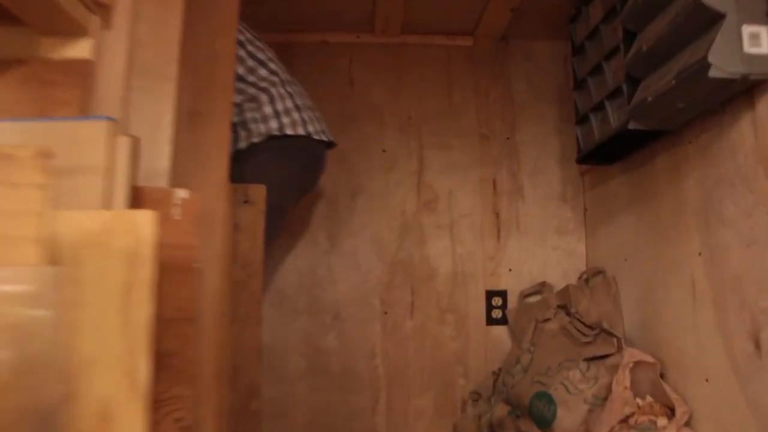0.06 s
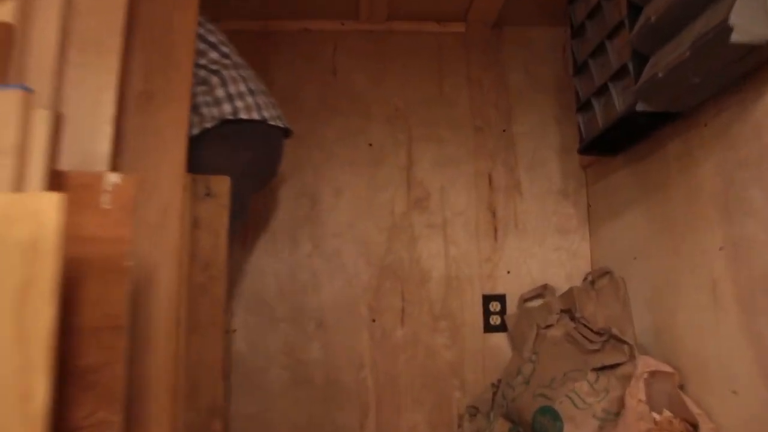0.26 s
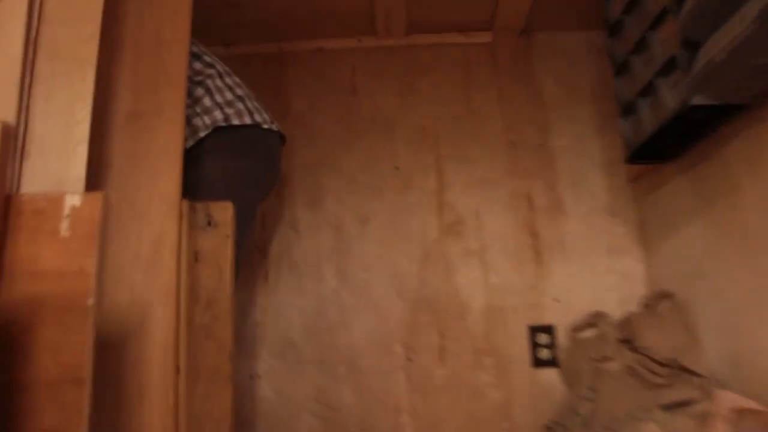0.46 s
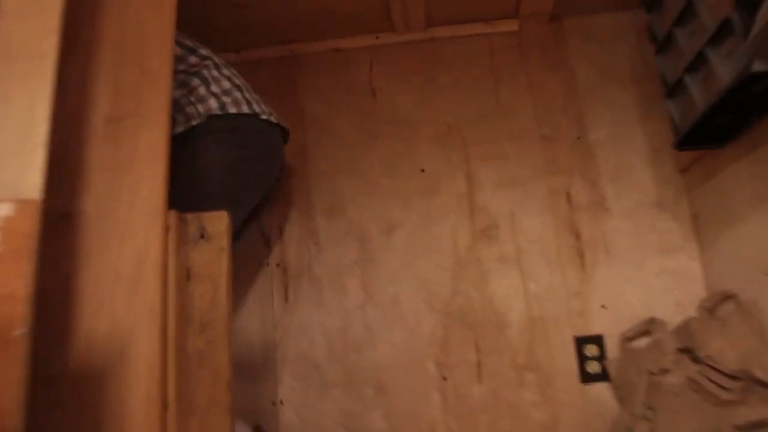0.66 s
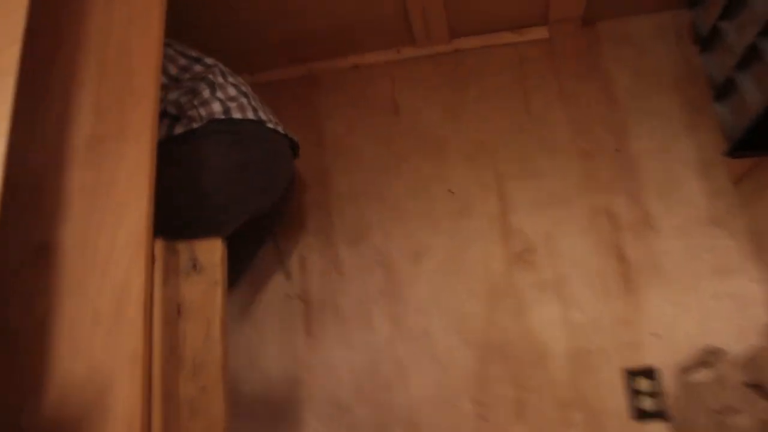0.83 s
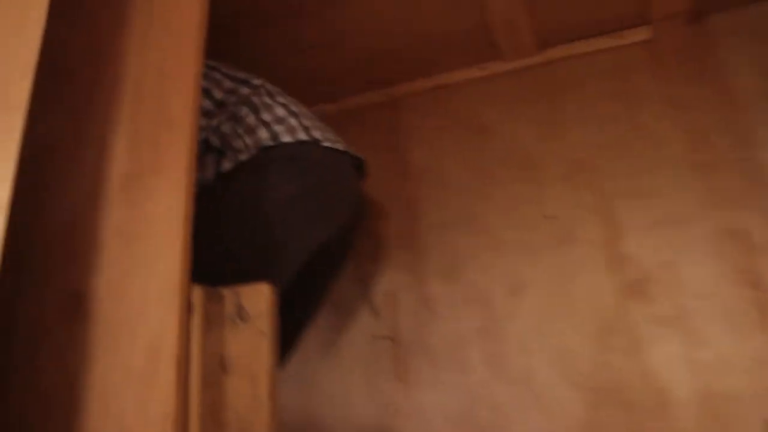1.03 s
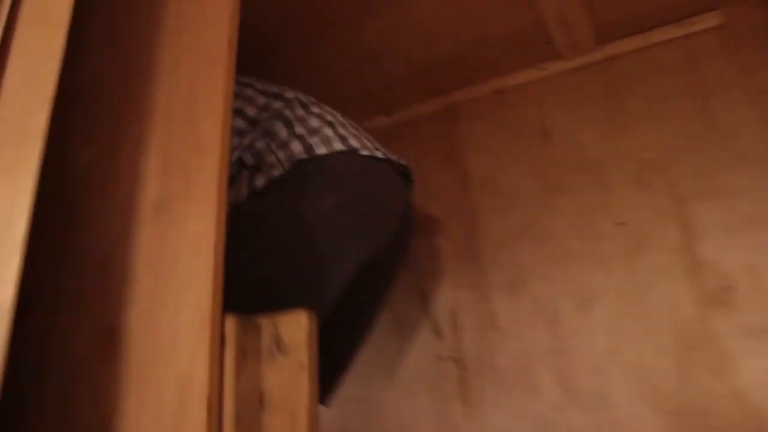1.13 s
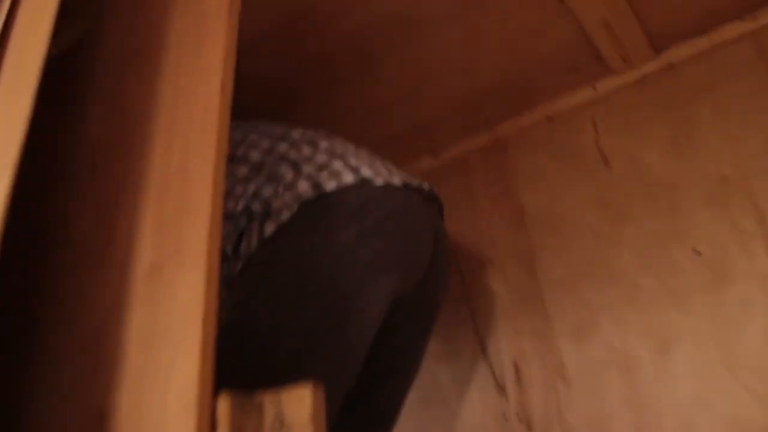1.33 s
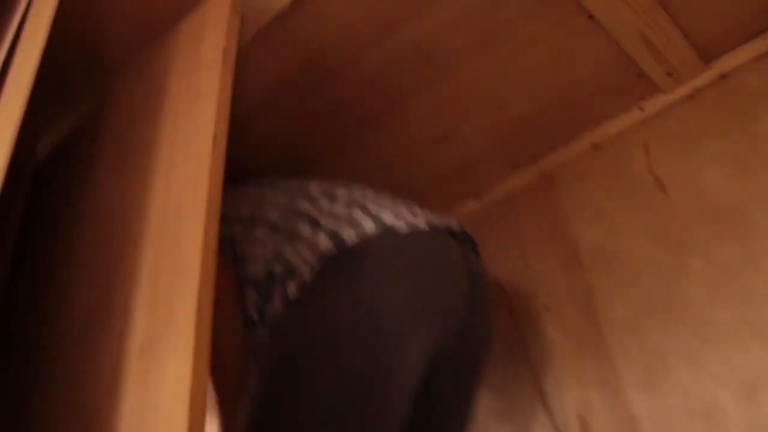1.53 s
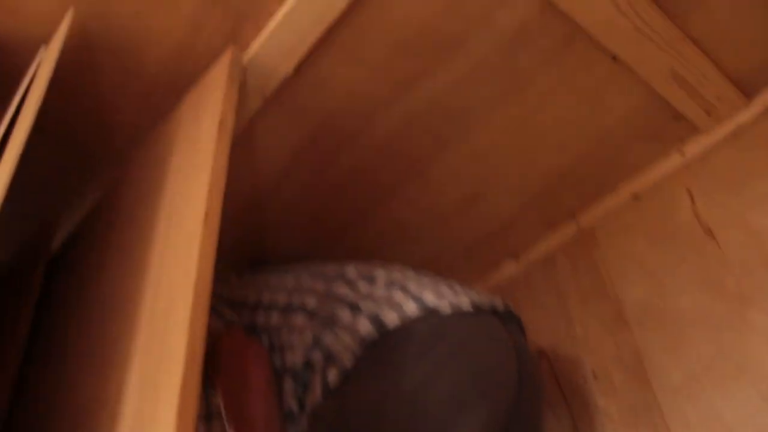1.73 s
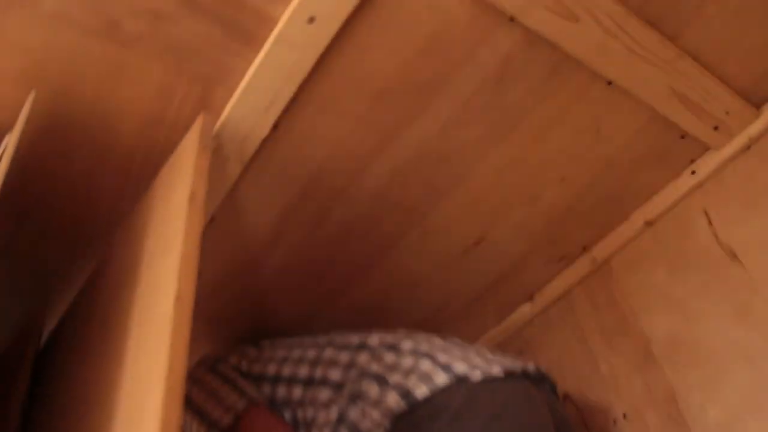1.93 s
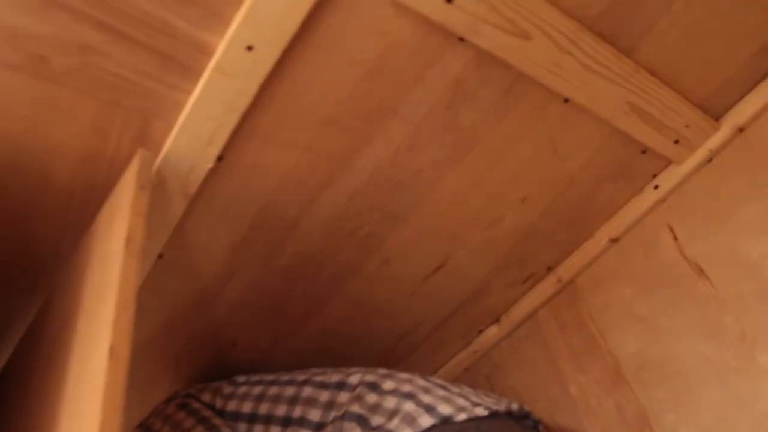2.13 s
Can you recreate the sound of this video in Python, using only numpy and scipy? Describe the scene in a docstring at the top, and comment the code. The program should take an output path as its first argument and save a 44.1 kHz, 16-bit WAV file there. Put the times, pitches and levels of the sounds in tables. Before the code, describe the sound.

Footsteps knock on steep wooden stairs, two hard steps and a softer one, over low hum

```python
"""Footfalls on a wooden staircase

Someone climbs steep wooden stairs in a small timber workshop. Heels and toes knock the treads: decaying
sines for the modes and decaying band noise for crack and tail. A slow boom of the whole staircase follows
each landing as beating low sines. Soles scuff and cloth rustles, both as shaped noise, among two small
ticks. Beneath lie a motor's wavering tones and the steady hiss of the room."""
import sys
import numpy as np
from scipy import signal
from scipy.io import wavfile

SR = 44100
rng = np.random.default_rng(int(sys.argv[2]) if len(sys.argv) > 2 else 0)


def materialize(psi):
    """Save the field psi as 16-bit PCM at rate SR to the path in sys.argv[1].

    A 1-D psi becomes a single channel; in a 2-D psi each row is a channel.
    """
    bounded = np.clip(np.atleast_2d(psi).T, -1, 1)
    quanta = np.round(bounded * 32767).astype(np.int16)
    wavfile.write(sys.argv[1], SR, quanta)


def level_to_linear(level):
    """Convert decibel levels to linear amplitude factors, elementwise."""
    exponent = np.asarray(level, float) / 20
    return 10 ** exponent


N = 97020

# Motor tones. Columns: f/Hz, rms level before waver/dB
MOTOR_TONES = [(59.2, -38.5), (91.5, -45.5), (118.4, -41.5), (177.6, -56), (236.9, -58), (296, -66.5),
               (352, -72.5), (555, -66.5), (620, -73), (879, -69), (2446, -74.5)]
HUM_WAVER_DB, HUM_WAVER_S = 1.2, 0.0004  # rms spread of level and of timing

# Relative spectrum of the room's hiss. Columns: f/Hz, density/(dB per Hz)
AIR_SPECTRUM = [(20, 0), (35, -2.5), (50, -4.5), (75, -10), (105, -15), (160, -13), (270, -16), (400, -25),
                (560, -24.5), (900, -32), (1600, -33.5), (2400, -36), (4000, -45.5), (5200, -49),
                (8000, -52), (10500, -54.5), (16000, -58), (20000, -60)]
AIR_DB = -44.5  # rms

# Loudness of the moving cloth. Columns: t/s, rms level/dB
RUSTLE_LEVEL = [(0, -62), (.06, -66.5), (.2, -69.5), (.28, -62.5), (.31, -56), (.35, -62.5), (.4, -62),
                (.47, -67), (.57, -61), (.66, -66), (.73, -59.5), (.88, -61.5), (.95, -67.5), (1.1, -62.5),
                (1.25, -71), (1.6, -65), (1.679, -60), (1.78, -108), (2.2, -81)]
# Relative spectrum of the cloth. Columns: f/Hz, density/(dB per Hz)
CLOTH_SPECTRUM = [(1500, 7), (3000, 3.5), (6000, 0.5), (9000, -1.5), (12500, -5), (16000, -3), (20000, -20)]

# Small ticks. Columns: t/s, level before the envelope/dB, f/Hz
TICKS = [(0.153, -40.5, 2980), (0.409, -50, 5850)]
TICK_RISE_S, TICK_T60_S = 0.00072, 0.015

# Heel or toe landings. Columns: t/s, knock level/dB, hardness as contact cut-off f/Hz,
# staircase boom level/dB, share of the free ringing time left under the foot [ratio]
LANDINGS = [(0.217, -11, 11700, -23, 0.79), (0.262, -26, 131, -29.5, 0.66), (1.033, -16, 9100, -19, 0.83),
            (1.083, -21.5, 147, -42, 0.86), (1.570, -17, 404, -55, 0.23), (1.608, -23, 493, -42.5, 0.25),
            (1.638, -22.5, 254, -42.5, 0.3)]
# Tread struck by each landing. Column: index of the tread [0, 1 or 2]
TREAD_OF_LANDING = [0, 0, 1, 1, 2, 2, 2]
# Tread and stringer modes, excited differently in each tread.
# Columns: f/Hz, first tread level/dB, second tread level/dB, third tread level/dB, free t60/s
TREAD_MODES = [(66.7, -6, 0.5, -9, 0.52), (93.5, -4.5, -4.5, 1, 0.33), (103.7, -12.5, -1, -1, 0.28),
               (139, -5, -4, 2, 0.19), (185.5, -8.5, -1, -7.5, .11), (232.7, -8, -9.5, -2, 0.073),
               (277, -10.5, -9.5, -5, .1), (323, -12, -2.5, -7.5, 0.042), (395.7, 2, -8.5, -11, 0.092),
               (456.7, -6, -9.5, -11.5, 0.16), (624, -11, -14, -12.5, 0.18), (770.6, -14, -8.5, -10.5, .11),
               (892, -11.5, -16, -19, 0.15), (1004, -12, -12, -23, 0.13), (1177, -3.5, -8.5, -8, 0.082),
               (1496, -8.5, -15, -7, 0.05), (1700, -3, -9, -6.5, 0.048), (2000, -15, -23, -12, 0.032),
               (2360, -15, -5.5, -17, 0.053), (2900, -22, -20, -20, 0.02)]
MODES_DB, MODE_SPREAD_DB = -2.5, 0.04
RISE_CYCLES, LAG_CYCLES = 0.17, 0.72  # in periods of each mode; the rise serves the noise bands too

# Relative spectrum of boards and walls after a knock. Columns: f/Hz, density/(dB per Hz)
KNOCK_SPECTRUM = [(60, -4.5), (150, 4.5), (434, -3), (753, -10), (1210, -14), (1990, -15), (2820, -18),
                  (4300, -36), (7000, -62), (10000, -65), (16000, -62), (20000, -80)]
# Free decay of that dense ringing. Columns: f/Hz, t60/s
KNOCK_DECAY = [(150, 0.33), (550, 0.35), (1460, 0.3), (3840, 0.12), (9000, 0.087)]
TAIL_DB, CRACK_DB, CRACK_FREE_T60_S = -8, -0.5, 0.038
SNAP_DB, SNAP_HZ, SNAP_T60_S = 3, 1840, 0.0032  # first touch of the hard sole edge

# Staircase sway; the first two modes start in opposition and beat.
# Columns: f/Hz, level relative to the boom/dB, t60/s
SWAY_MODES = [(25.99, -1, 1.0), (32.27, 3.5, 0.73), (41, -25, 0.28)]
SWAY_RISE_S, SWAY_LAG_S = 0.0033, 0.012

# Slaps and scuffs of the soles. Columns: t/s, level before envelope and cut-off/dB, rise/s, t60/s, cut-off f/Hz
SCUFFS = [(1.085, -27, 0.00078, 0.036, 18000), (1.086, -44.5, 0.003, 0.23, 9200),
          (1.455, -38.5, 0.011, .1, 4440), (1.545, -42, 0.0037, 0.13, 12200),
          (1.568, -46.5, .002, 0.13, 3880), (1.604, -48, 0.0069, 0.2, 6000), (1.628, -52, .015, 0.34, 6950),
          (1.04, -37, 0.0049, 0.072, 18000)]
# Relative spectrum of sole on wood. Columns: f/Hz, density/(dB per Hz)
GRIT_SPECTRUM = [(300, -49), (700, -2.5), (1100, -8), (1600, -5.5), (3300, -5.5), (4200, -17), (6320, -14),
                 (8200, -20), (12000, -24.5), (16000, -29)]

# Edges of the half-octave noise bands, f/Hz
BAND_EDGES = 18 * 2 ** np.arange(0, 10.1, 0.5)


def at_hz(points, hz):
    """Logarithmic frequency scale: interpolates a table linearly in log f."""
    table = np.array(points)
    return np.interp(np.log(hz), np.log(table[:, 0]), table[:, 1])


def unit(x):
    """Normalisation of power: scales a signal to rms 1."""
    return x / np.sqrt(np.mean(x ** 2) + 1e-20)


def low(x, cut_hz):
    """Second-order low-pass: attenuates what lies above the cut-off."""
    return signal.sosfilt(signal.butter(2, cut_hz, fs=SR, output="sos"), x)


def drift(rate_hz):
    """Low-passed random process: two equal poles at rate_hz leave a slow wander of spread 1."""
    stride = 40  # samples between computed points
    settling = 2000  # points discarded
    pole = np.exp(-2 * np.pi * rate_hz * stride / SR)
    white = rng.standard_normal(N // stride + 2 + settling)
    slow = signal.lfilter([1], [1, -2 * pole, pole * pole], white)[settling:]
    return np.interp(np.arange(N) / stride, np.arange(len(slow)), unit(slow))


def bands():
    """Band-pass decomposition: half-octave bands of white noise as (centre Hz, noise)."""
    white = rng.standard_normal((2, N + SR // 2))
    out = []
    for k, (lo, hi) in enumerate(zip(BAND_EDGES, BAND_EDGES[1:])):
        sos = signal.butter(2, [lo, hi], "band", fs=SR, output="sos")
        noise = signal.sosfilt(sos, white[k % 2])[-N:]  # adjacent bands use independent noise
        out.append((np.sqrt(lo * hi), noise))
    return out


def coloured(spectrum, patchy_db, rate_hz):
    """Spectral shaping: weighted noise bands, each flickering in level by itself; rms 1."""
    total = np.zeros(N)
    for hz, noise in bands():
        level_db = at_hz(spectrum, hz) + patchy_db * drift(rate_hz)
        total += level_to_linear(level_db) * noise
    return unit(total)


def strike(start_s, rise_s, t60):
    """Transient excitation: time since the start, and an exponential rise times a 60 dB decay in t60."""
    t = np.maximum(np.arange(N) / SR - start_s, 0)
    rise = 1 - np.exp(-t / max(rise_s, 1e-4))
    decay = np.exp(-np.log(1000) * t / t60)
    return t, rise * decay


def ring(start_s, rise_s, t60, hz):
    """Damped oscillator: one sine under the transient envelope."""
    t, envelope = strike(start_s, rise_s, t60)
    return envelope * np.sin(2 * np.pi * hz * t)


def motor_hum():
    """Steady tones modulated in amplitude one by one and in timing all together."""
    t = np.arange(N) / SR + HUM_WAVER_S * drift(1.48)
    total = np.zeros(N)
    for hz, db in MOTOR_TONES:
        level = np.sqrt(2) * level_to_linear(db + HUM_WAVER_DB * drift(5.9))  # rms to peak
        total += level * np.sin(2 * np.pi * hz * t)
    return total


def room_hiss():
    """Stationary broadband noise: a falling spectrum with almost no flicker."""
    return level_to_linear(AIR_DB) * coloured(AIR_SPECTRUM, patchy_db=0.08, rate_hz=15.5)


def cloth_rustle():
    """Friction noise: bright flickering hiss whose level follows the moving cloth."""
    t, db = np.transpose(RUSTLE_LEVEL)
    level = level_to_linear(np.interp(np.arange(N) / SR, t, db))
    return level * coloured(CLOTH_SPECTRUM, patchy_db=1.2, rate_hz=30)


def ticks():
    """Damped oscillation: each tick is one short ring."""
    return sum(level_to_linear(db) * ring(t, TICK_RISE_S, TICK_T60_S, hz) for t, db, hz in TICKS)


def sole_snap(start_s):
    """Impulsive contact: the hard sole edge gives a very short ring."""
    return level_to_linear(SNAP_DB) * ring(start_s, 0, SNAP_T60_S, SNAP_HZ)


def tread_ringing(start_s, tread, free, chance):
    """Modal superposition: signs alternate, low modes arrive later, and the foot shortens the decay."""
    total = np.zeros(N)
    for k, ((hz, *tread_db, t60), draw) in enumerate(zip(TREAD_MODES, chance)):
        level = level_to_linear(MODES_DB + tread_db[tread] + MODE_SPREAD_DB * draw)
        mode = ring(start_s + LAG_CYCLES / hz, RISE_CYCLES / hz, free * t60, hz)
        total += (-1) ** k * level * mode
    return total


def crack_and_tail(start_s, free, noise_bands):
    """High modal density: overlapping modes act as decaying noise, a brief crack and a longer tail."""
    total = np.zeros(N)
    for hz, noise in noise_bands:
        rise_s = RISE_CYCLES / hz
        crack = level_to_linear(CRACK_DB) * strike(start_s, rise_s, free * CRACK_FREE_T60_S)[1]
        tail = level_to_linear(TAIL_DB) * strike(start_s, rise_s, free * at_hz(KNOCK_DECAY, hz))[1]
        total += noise * (crack + tail)
    return total


def staircase_sway(start_s, boom_db):
    """Beating of neighbouring low modes: the whole staircase booms a moment after the landing."""
    total = np.zeros(N)
    for k, (hz, mode_db, t60) in enumerate(SWAY_MODES):
        mode = ring(start_s + SWAY_LAG_S, SWAY_RISE_S, t60, hz)
        total += (-1) ** k * level_to_linear(boom_db + mode_db) * mode
    return total


def footfalls():
    """Impact excitation: contact hardness low-passes each knock, and the sway is added unfiltered."""
    shaped = [(hz, level_to_linear(at_hz(KNOCK_SPECTRUM, hz)) * noise) for hz, noise in bands()]
    rms = np.sqrt(sum(np.mean(noise ** 2) for _, noise in shaped))
    noise_bands = [(hz, noise / rms) for hz, noise in shaped]
    chance = rng.standard_normal((len(LANDINGS), len(TREAD_MODES)))
    total = np.zeros(N)
    for (t, db, cut_hz, boom_db, free), tread, draws in zip(LANDINGS, TREAD_OF_LANDING, chance):
        knock = sole_snap(t)
        knock += tread_ringing(t, tread, free, draws)
        knock += crack_and_tail(t, free, noise_bands)
        total += level_to_linear(db) * low(knock, cut_hz)
        total += staircase_sway(t, boom_db)
    return total


def sole_scuffs():
    """Sliding friction: gritty noise of sole on wood in low-passed bursts."""
    grit = coloured(GRIT_SPECTRUM, patchy_db=2.5, rate_hz=44)
    total = np.zeros(N)
    for t, db, rise_s, t60, cut_hz in SCUFFS:
        burst = strike(t, rise_s, t60)[1] * grit
        total += level_to_linear(db) * low(burst, cut_hz)
    return total


def scene():
    """Linear superposition: all sources add at one microphone."""
    background = motor_hum() + room_hiss()
    climber = cloth_rustle() + footfalls() + sole_scuffs()
    return (background + ticks() + climber)[None]


def top_cut(x):
    """Nothing passes above the cut-off."""
    return signal.sosfilt(signal.butter(12, 16530, fs=SR, output="sos"), x)


def record(dry):
    """Single-channel pickup: the finished mix passes through the recorder's treble cut-off, without further
    gain."""
    return top_cut(dry)


dry = scene()
out = record(dry)
materialize(out)
```